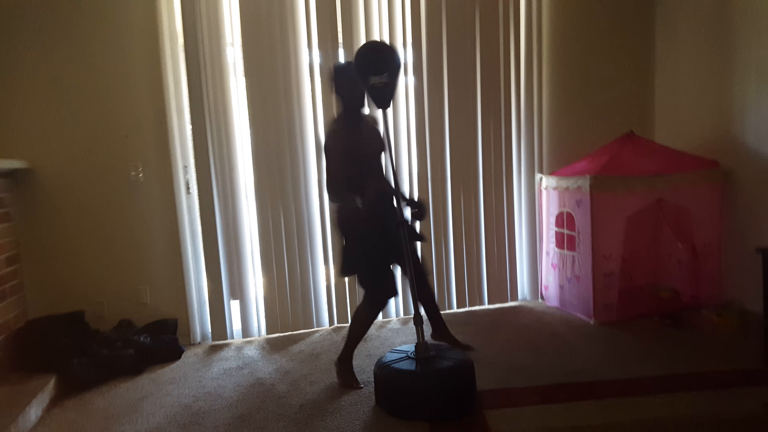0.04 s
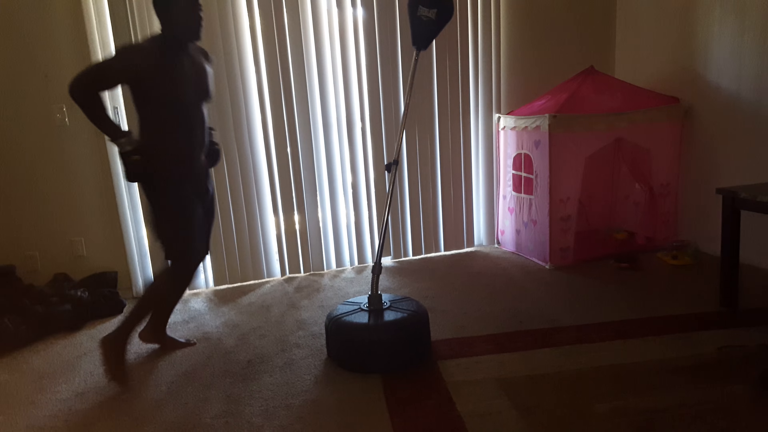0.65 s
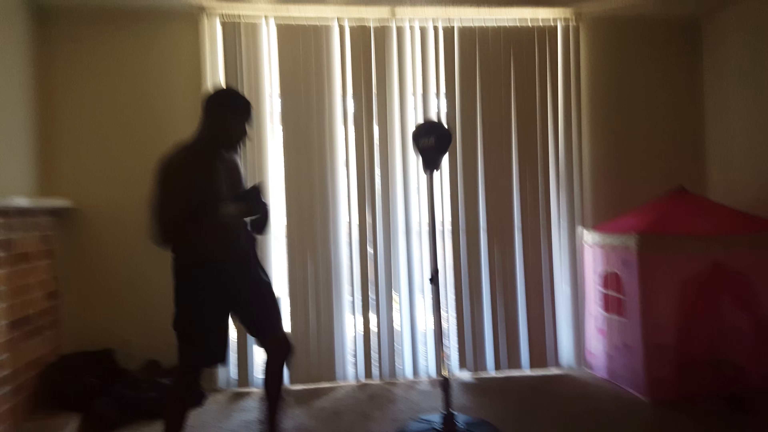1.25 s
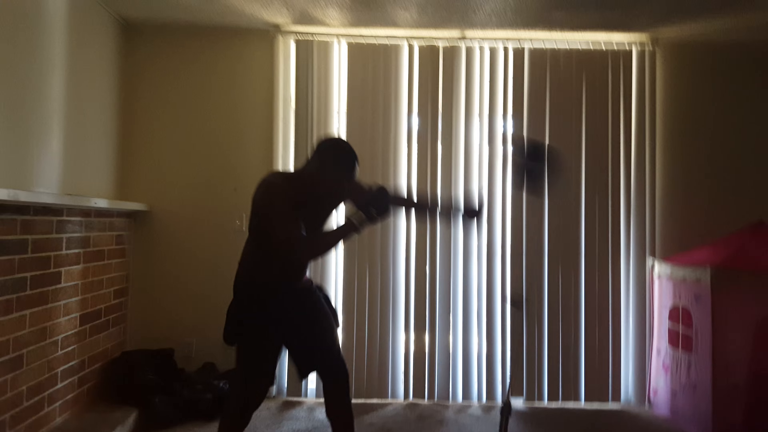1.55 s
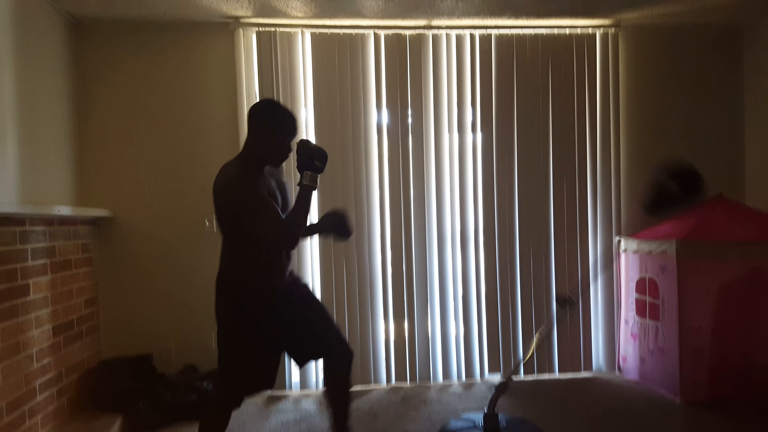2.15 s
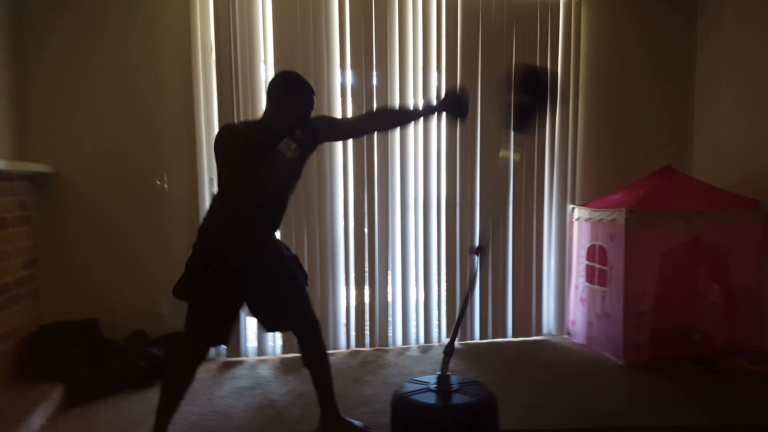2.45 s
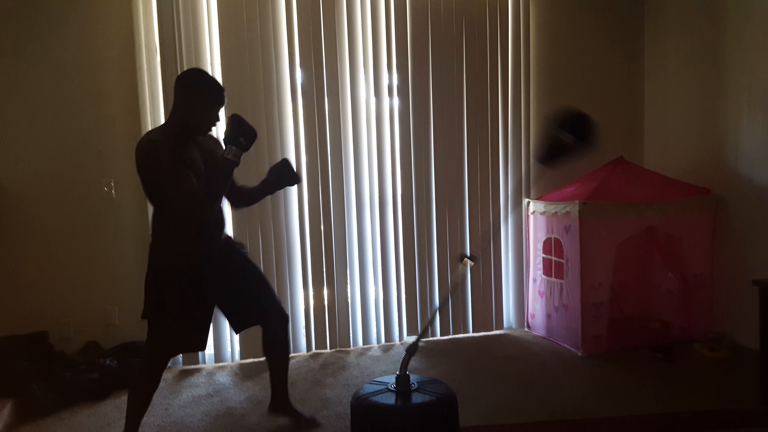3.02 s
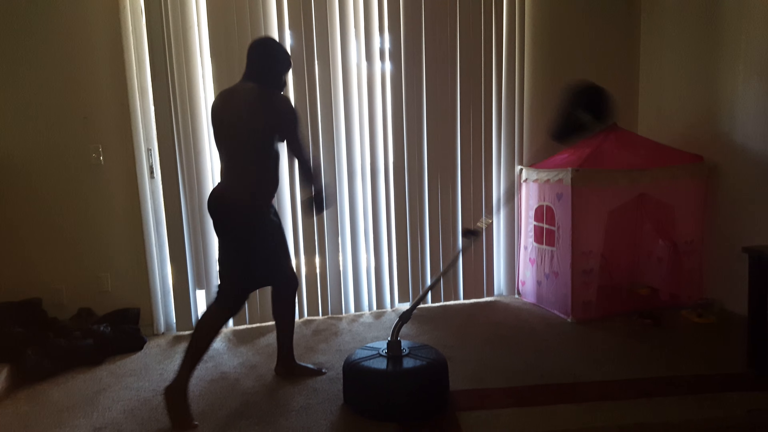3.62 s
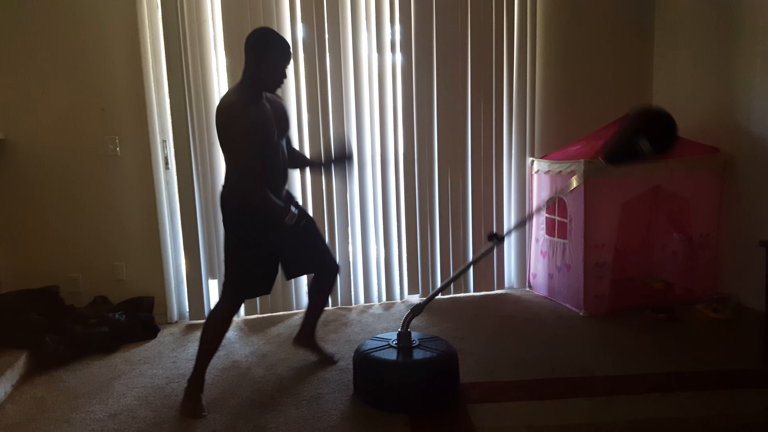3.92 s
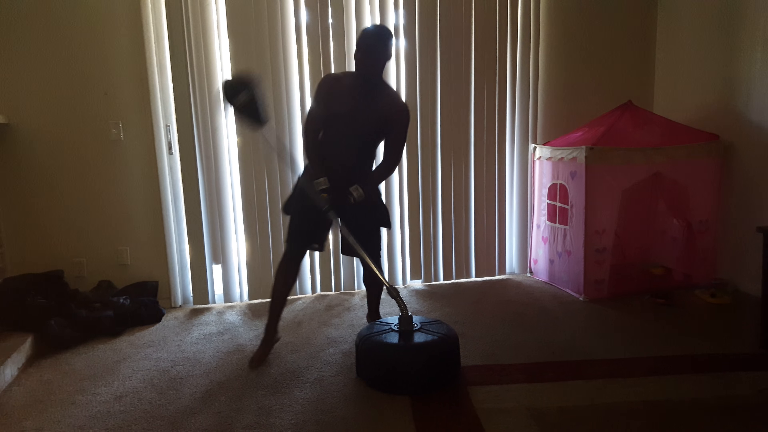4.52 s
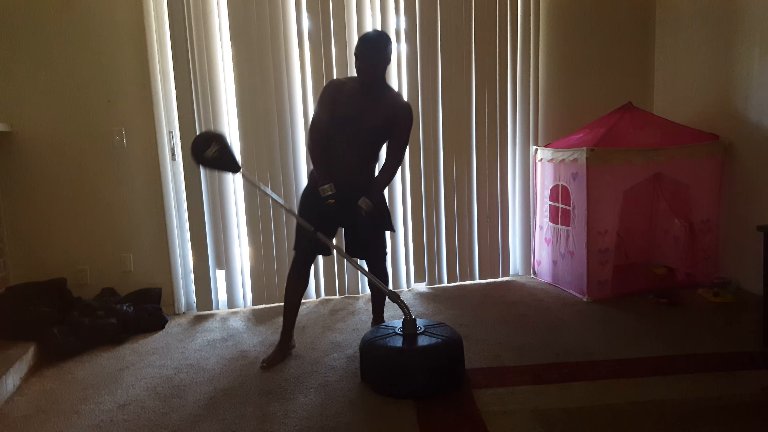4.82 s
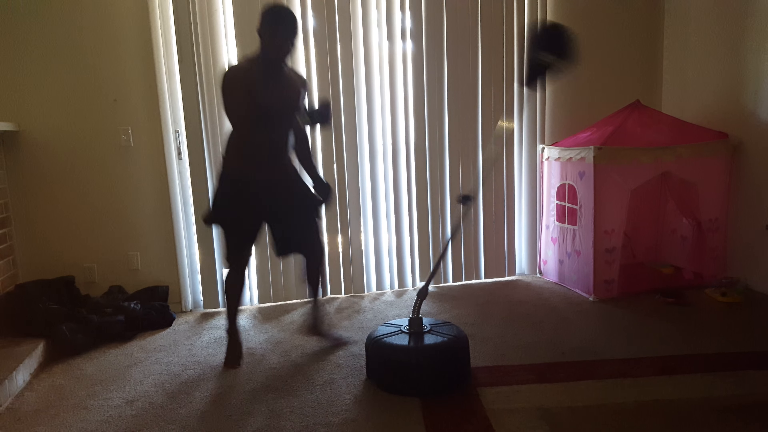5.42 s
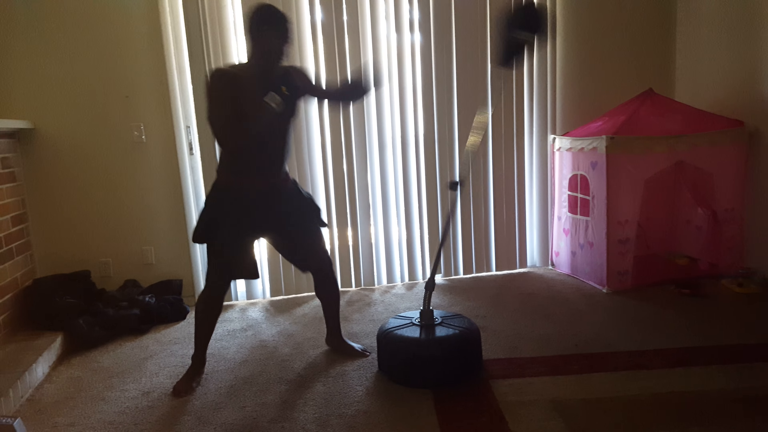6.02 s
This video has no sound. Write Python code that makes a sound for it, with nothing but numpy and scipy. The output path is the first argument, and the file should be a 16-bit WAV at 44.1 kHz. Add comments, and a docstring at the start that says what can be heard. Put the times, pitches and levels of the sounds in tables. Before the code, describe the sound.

A faint hum fills a carpeted living room, heard a few metres from a boxer. For the first 1.5 seconds, bare feet step softly and clothing rustles. At about 1.5 seconds a glove hits a reflex bag with a slap and a hollow thud; the metal spring rattles, the plastic base knocks and the floor booms low. Small ticks follow near 2 seconds. A harder punch lands at 2.4 seconds, then a quick, duller pair at 3.3 and 3.5, each with rattling and knocking. From about 4 to 6 seconds it is quieter, with swishes of cloth and leather, shuffling feet and light knocks from the swinging pole, a faint squeak at 4.5 and a light graze of the ball at 5.3. Just before 6.2 seconds a final strong punch lands with a sharp rattle, a clack from the base and a high metal squeak.

```python
"""A boxer works a free-standing reflex bag in a carpeted living room, a few metres away.
Over a faint hum, clothing rustles, bare feet shuffle and a fitting ticks. From 1.5 s gloves strike
the hollow ball four times: each impact excites its air cavity, the pole's coil spring rattles, the
plastic base knocks and the floor booms in its lowest modes. In a lull the spring joint squeaks and
the ball grazes the boxer; just after 6 s a fifth punch lands, with another squeak."""
import sys
import numpy as np
from scipy import signal
from scipy.fft import rfft, irfft, next_fast_len
from scipy.io import wavfile
from scipy.ndimage import uniform_filter1d

SR = 44100
rng = np.random.default_rng(int(sys.argv[2]) if len(sys.argv) > 2 else 0)


def master_out(mix):
    """Clip the mix to full scale and print it as 16-bit PCM to the path in sys.argv[1]."""
    frames = np.transpose(np.atleast_2d(mix))
    ceiling = np.clip(frames, -1, 1)
    pcm = np.round(ceiling * 32767).astype(np.int16)
    wavfile.write(sys.argv[1], SR, pcm)


N = 276066
TIME = np.arange(N) / SR


def from_db(db):
    """Amplitude ratio of a level in decibels."""
    return 10 ** (np.asarray(db) / 20)


def rms_one(x):
    """Normalise to unit mean power."""
    return x / np.sqrt(np.mean(x ** 2) + 1e-20)


def energy_one(x):
    """Normalise to unit energy."""
    return x / np.sqrt(np.sum(x ** 2) + 1e-20)


def at_hz(points, hz):
    """Interpolate a table on a logarithmic frequency axis."""
    freqs, values = np.transpose(points)
    return np.interp(np.log(np.maximum(hz, 1)), np.log(freqs), values)


def convolve(x, response):
    """Linear filtering: a mono sound passes through a mono or stereo impulse response."""
    return signal.fftconvolve(np.atleast_2d(x), np.atleast_2d(response), axes=-1)[:, :N]


def body(spectrum, modes=(), size=4096):
    """Minimum-phase impulse response: a broad spectrum with Lorentzian peaks and dips."""
    hz = np.fft.rfftfreq(size, 1 / SR)
    modes_db = sum(gain / (1 + (2 * (hz - centre) / width) ** 2) for centre, width, gain in modes)
    cepstrum = irfft(np.log(from_db(at_hz(spectrum, hz) + modes_db)))
    cepstrum[1:size // 2] *= 2  # folding onto positive time makes the response causal
    cepstrum[size // 2 + 1:] = 0
    return energy_one(irfft(np.exp(rfft(cepstrum))))


def damped_mode(hz, width_hz, size):
    """Free vibration of a damped oscillator: the wider the resonance, the faster the decay."""
    age = TIME[:size]
    return energy_one(np.sin(2 * np.pi * hz * age) * np.exp(-np.pi * width_hz * age))


def voiced_at(spectrum, pitch_hz, db_per_octave=5):
    """Small, stiff contacts radiate little bass: the spectrum falls from an octave below the pitch."""
    return [(hz, db + db_per_octave * min(0, np.log2(2 * hz / pitch_hz))) for hz, db in spectrum]


def chatter(length, per_s, spread_db, swell=0, size=6144):
    """Poisson train of uneven contacts that swells over a share of its length, then dies away."""
    age = TIME[:size]
    touch = rng.random(size) < per_s / SR
    force = from_db(spread_db * np.clip(rng.standard_normal(size), -2, 2)) * rng.choice([-1, 1], size)
    touch[0], force[0] = True, from_db(spread_db)  # the first contact is a firm one
    rise = 1 - np.exp(-(age + 1 / SR) / max(swell * length, 1e-9))
    return energy_one(touch * force * rise * np.exp(-(age / length) ** 2))


def impulses(rows):
    """Ideal impacts: one impulse for each (time [s], level [dB])."""
    out = np.zeros(N)
    for s, db in rows:
        out[int(s * SR)] += from_db(db)
    return out


# Likeness of left and right in the room: (frequency [Hz], correlation [-1 to 1])
CORRELATION = [(60, 0.92), (180, 0.94), (350, 0.92), (700, 0.5), (1400, 0.13), (2800, 0.037), (5500, -0.11),
               (16000, -0.0048)]
def diffuse(spectrum, size=N):
    """Diffuse field: noise from all sides is correlated in the bass and independent in the treble."""
    hz = np.fft.rfftfreq(size, 1 / SR)
    mid, side = rfft(rng.standard_normal((2, size)))
    alike = np.clip(at_hz(CORRELATION, hz), -1, 1)
    pair = np.sqrt(1 + alike) * mid + np.sqrt(1 - alike) * side * [[1], [-1]]
    return rms_one(irfft(pair * from_db(at_hz(spectrum, hz)), size))


# Reverberation time: (frequency [Hz], T60 [s])
ROOM_T60 = [(120, 0.52), (700, 0.53), (3000, 0.51), (7000, 0.36), (13000, 0.21)]
# Direct sound and first reflections: (delay [s], relative amplitude [ratio])
ARRIVALS = [(0, 13.6), (.0026, 5.6), (.0068, 3.5)]
def room_paths(clarity_db, build_s=0.0016, size=21600):
    """Reverberation: each new path has early arrivals and a tail that dies soonest in the treble."""
    age, hz = TIME[:size], np.fft.rfftfreq(size, 1 / SR)
    centres, t60 = np.transpose(ROOM_T60)
    bands = np.array([at_hz(np.column_stack([centres, own]), hz) for own in np.eye(len(centres))])
    fades = np.exp(-np.log(1000) * age / t60[:, None]) * (1 - np.exp(-age / build_s))
    while True:
        white = rfft(diffuse([(1, 0), (SR, 0)], size=size))
        path = np.sum(irfft(white[:, None] * bands) * fades, axis=1)
        for delay, amplitude in ARRIVALS:
            path[:, int(delay * SR)] += amplitude * from_db(clarity_db)
        yield path


def in_room(sounds, clarity_db):
    """Superposition of (time [s], sound) pairs; boxer and bag move, so each takes its own path."""
    out = np.zeros((2, N))
    for (s, sound), path in zip(sounds, room_paths(clarity_db)):
        heard = convolve(sound, path)
        onward = out[:, int(s * SR):]
        onward[:, :heard.shape[1]] += heard[:, :onward.shape[1]]
    return out


# Spectrum of still room air: (frequency [Hz], relative level [dB])
AIR_SPECTRUM = [(20, -32), (40, -2.5), (110, 3.5), (200, 0), (400, -8.5), (1000, -9), (2500, -12),
                (6000, -18), (10000, -27), (16000, -38.5)]
def background(air_db=-59, hum_db=-62, hum_hz=120):
    """Stationary noise: diffuse room air and the pure tone of an appliance's mains hum."""
    return from_db(air_db) * diffuse(AIR_SPECTRUM) + from_db(hum_db) * np.sin(2 * np.pi * hum_hz * TIME)


# Envelope of sliding feet and cloth: (time [s], level [dB])
RUSTLE_ENVELOPE = [(0.0, -54), (0.212, -62.5), (0.266, -49.5), (0.434, -59.5), (0.802, -46), (0.898, -51.5),
                   (1.316, -51.5), (1.5, -61.5), (1.95, -51), (2.248, -58.5), (2.42, -51), (2.95, -58),
                   (3.146, -55), (3.28, -63), (3.95, -62), (4.524, -49.5), (4.916, -66.5), (5.182, -77),
                   (5.28, -58), (5.55, -49), (5.66, -47), (5.908, -56), (6.14, -48.5)]
# Spectrum of rubbing fibres: (frequency [Hz], relative level [dB])
CLOTH_SPECTRUM = [(80, 1.5), (200, 3), (400, 4), (900, -2.5), (1600, -2), (2700, -1.5), (3800, -6.5),
                  (5500, -5.5), (8000, -11.5), (13000, -16.5), (16000, -24)]
def rustle(grain_db=1.0):
    """Sliding friction: the fibres under soles and in shorts catch unevenly, modulating the noise."""
    grain = rms_one(uniform_filter1d(rng.standard_normal(N), size=300))
    level_db = np.interp(TIME, *np.transpose(RUSTLE_ENVELOPE)) + grain_db * grain
    return from_db(level_db) * diffuse(CLOTH_SPECTRUM)


# Bare feet landing: (time [s], level [dB], pitch [Hz], length [s])
STEPS = [(.01, -51, 111, 0.037), (.25, -52.5, 437, .02), (.329, -52.5, 910, 0.014), (.426, -53, 180, .006),
         (0.519, -51, 865, 0.015), (0.633, -50, 594, .014), (1.085, -52.5, 860, 0.019),
         (1.146, -50, 408, .014), (4.0, -52, 497, .006)]
# Spectrum of a heel on carpet: (frequency [Hz], relative level [dB])
HEEL_SPECTRUM = [(40, -5), (120, 13.5), (400, 1), (650, -4), (950, -0.5), (1500, -5.5), (5000, -21),
                 (16000, -47)]
def footsteps(ring_db=8, relative_width=0.43):
    """Cushioned impact: a soft heel on carpet gives a dull sound with one broad resonance."""
    for s, db, hz, length in STEPS:
        heel = body(voiced_at(HEEL_SPECTRUM, hz), [(hz, relative_width * hz, ring_db)])
        yield s, from_db(db) * convolve(chatter(length, per_s=900, spread_db=0.5), heel)


# Ticks of the fittings: (time [s], relative level [dB])
TICKS = [(.560, -57.5), (1.956, -52.5), (1.972, -50.5), (2.114, -61)]
# Spectrum of the fittings and the spring: (frequency [Hz], relative level [dB])
METAL_SPECTRUM = [(100, -15.5), (600, -12.5), (1800, -10), (2800, -2), (3400, -3.5), (4800, -0.5),
                  (7300, -2.5), (10000, -8.5), (13500, -13), (16000, -20)]
def ticks(direct_db=24, room_db=-7):
    """Impulse excitation: single light contacts in the fittings click, with a little reverberation."""
    tick = convolve(impulses(TICKS), body(METAL_SPECTRUM))
    return from_db(direct_db) * tick + from_db(room_db) * convolve(tick, next(room_paths(0)))


# Leather and nylon brushing past: (peak time [s], level [dB], standard deviation [s])
SWISHES = [(1.205, -49, 0.028), (1.32, -51.5, 0.018), (2.152, -53, 0.023), (4.202, -53.5, 0.037),
           (4.483, -51, 0.077), (4.865, -56, 0.05), (5.211, -45.5, 0.018), (5.647, -51, 0.074)]
# Spectrum of smooth rubbing: (frequency [Hz], relative level [dB])
SWISH_SPECTRUM = [(500, -3), (2500, -7), (5000, -2), (8000, -5), (11000, -10.5), (14000, -6), (16000, -20)]
def swishes():
    """Friction noise swells and fades in a Gaussian envelope as smooth surfaces pass."""
    envelope = sum(from_db(db) * np.exp(-((TIME - s) / width) ** 2 / 2) for s, db, width in SWISHES)
    return envelope * diffuse(SWISH_SPECTRUM)


# Blows and their effect on the stand: (time [s], thud level [dB], thud pitch [Hz], slap level [dB],
# bump level [dB], bump pitch [Hz], clack level [dB], clack pitch [Hz], settling level [dB],
# floor drive level [dB])
PUNCHES = [(1.5301, -21.5, 360, -19.5, -21.5, 280, -22.5, 900, -29, -42),
           (2.4398, -18, 434, -15.5, -18.5, 250, -21.5, 700, -23.5, -39.5),
           (3.3099, -22, 370, -37, -26, 360, -25.5, 330, -34, -48),
           (3.463, -26.5, 353, -48, -26.5, 330, -24.5, 260, -33, -41.5),
           (6.1602, -17.5, 360, -21.5, -20.5, 560, -16, 866, -25, -34.5)]
# Spectra of the hollow ball and of the leather: (frequency [Hz], relative level [dB])
THUD_SPECTRUM = [(40, -24), (90, -7), (170, -4), (300, -4.5), (500, -6), (950, -6.5), (1500, -9.5),
                 (3000, -35.5), (16000, -20)]
SLAP_SPECTRUM = [(100, -7), (500, -9.5), (850, -5.5), (1300, -4.5), (2000, -7), (3500, -9), (6500, -10.5),
                 (10000, -13.5), (16000, -29.5)]
# Resonances and dips of ball, pole and base: (frequency [Hz], bandwidth [Hz], gain [dB])
STAND_MODES = [(248, 29, 3), (404, 9.7, 4), (497.7, 6, 3), (580, 110, 0.5), (714, 8.6, -10),
               (872, 16, -8.5), (1096, 49, 4.5)]
def punches(ring_db=8, relative_width=0.19):
    """Cavity resonance: the glove's leather slaps and the air-filled ball answers with a hollow thud."""
    for s, thud_db, hz, slap_db, *_ in PUNCHES:
        thud = body(THUD_SPECTRUM, STAND_MODES + [(hz, relative_width * hz, ring_db)])
        yield s, -from_db(thud_db) * thud - from_db(slap_db) * body(SLAP_SPECTRUM)


# Clashes as the spring bends and returns: (time [s], level [dB], length [s], tilt [dB/octave])
RATTLES = [(1.543, -15, .021, -0.5), (1.574, -15, .042, 3), (1.7015, -26, 0.008, 3),
           (2.439, -17.5, .021, -.5), (2.493, -22.5, 0.019, 0), (2.596, -20, 0.0046, 2.5),
           (3.323, -17, 0.0027, 1.5), (3.343, -15.5, 0.012, 2), (3.419, -27, 0.016, 3),
           (3.471, -21, 0.023, -.5), (3.563, -17, .012, 2.5), (4.367, -41, 0.0026, -4),
           (5.375, -37, .012, -4.5), (5.417, -36, 0.0083, 1), (6.169, -15.5, 0.024, 2.5),
           (6.203, -12, 0.0085, 0.3)]
# Resonances of the spring: (frequency [Hz], bandwidth [Hz], gain [dB])
SPRING_MODES = [(5006, 50, 3), (5329, 40, 4), (6790, 30, 4), (7224, 25, 5), (7617, 30, 3)]
def spring_rattles():
    """Repeated impact: coils clash in fast bursts and excite the spring's high modes."""
    for s, db, length, tilt in RATTLES:
        spectrum = [(hz, level + tilt * np.log2(hz)) for hz, level in METAL_SPECTRUM]
        clashes = chatter(length, per_s=2000, spread_db=2.0, swell=0.19)
        yield s, from_db(db) * convolve(clashes, body(spectrum, SPRING_MODES))


def rocking(bump_delay_s=0.014, clack_delay_s=0.036, length_s=0.012):
    """Damped rocking: after each punch the pole bumps, the base clacks and the stand settles."""
    interval_s, loss_db, settle_length_s, settle_hz = 0.026, 6.5, 0.005, 172
    for s, _, _, _, bump_db, bump_hz, clack_db, clack_hz, settle_db, _ in PUNCHES:
        yield s + bump_delay_s, bump_db, length_s, bump_hz
        yield s + clack_delay_s, clack_db, length_s, clack_hz
        for bounce in range(3):
            bounce_s = s + clack_delay_s + (bounce + 1) * interval_s
            yield bounce_s, settle_db - bounce * loss_db, settle_length_s, settle_hz


# Lone knocks as the pole swings on: (time [s], level [dB], length [s], pitch [Hz])
LONE_KNOCKS = [(1.704, -44.5, 0.011, 334), (2.612, -35, .0098, 176), (3.584, -31, 0.015, 1220),
               (3.761, -46.5, .009, 360), (3.772, -49, .008, 955), (4.362, -50, 0.0075, 400),
               (4.43, -47, 0.048, 217), (5.388, -45, 0.0066, 198), (5.422, -42.5, 0.0067, 1280),
               (5.441, -44.5, 0.014, 416), (5.543, -40.5, 0.14, 304)]
# Spectrum of the plastic base: (frequency [Hz], relative level [dB])
BASE_SPECTRUM = [(35, -15.5), (60, -2.5), (120, 1.5), (260, -3), (450, -3.5), (900, -6.5), (1500, -13),
                 (2800, -14.5), (6000, -17.5), (16000, -47)]
def base_knocks(ring_db=11, relative_width=0.32):
    """Shell resonance: the pole bumps in its hollow plastic base, each bump favouring one mode."""
    for s, db, length, hz in [*rocking(), *LONE_KNOCKS]:
        shell = body(voiced_at(BASE_SPECTRUM, hz), STAND_MODES + [(hz, relative_width * hz, ring_db)])
        yield s, from_db(db) * convolve(chatter(length, per_s=350, spread_db=3.0), shell)


# Lowest modes of the floor: (frequency [Hz], gain [dB], T60 [s])
FLOOR_MODES = [(40.5, 2, 1), (79.4, 15, 0.38)]
def floor_boom(delay_s=0.0215, rise_s=0.016):
    """Structure-borne sound: just after each punch the rocking base sets the floor's modes swinging."""
    age = TIME[:SR]
    ring = sum(from_db(db - 60 * age / t60) * np.sin(2 * np.pi * hz * age) for hz, db, t60 in FLOOR_MODES)
    thumps = impulses((s + delay_s, drive_db) for s, *_, drive_db in PUNCHES)
    return convolve(thumps, ring * (1 - np.exp(-age / rise_s)))


# Squeaks of the spring joint: (time [s], level [dB], length [s])
SQUEAKS = [(4.498, -41, 0.019), (6.209, -21, .04)]
# Resonances of the joint: (frequency [Hz], bandwidth [Hz], relative level [dB])
JOINT_MODES = [(4440, 160, -7), (4900, 110, -7), (4810, 140, 2)]
def squeaks():
    """Stick-slip friction: tiny slips in the joint keep a cluster of metal resonances ringing."""
    for s, db, length in SQUEAKS:
        scrape = 0
        for hz, width_hz, mode_db in JOINT_MODES:
            slips = chatter(length, per_s=2800, spread_db=2.5)
            scrape = scrape + from_db(mode_db) * convolve(slips, damped_mode(hz, width_hz, SR // 20))
        yield s, from_db(db) * energy_one(scrape)


# The ball brushes the boxer: (time [s], slap level [dB], ring level [dB], pitch [Hz], bandwidth [Hz])
GRAZE = (5.3097, -38, -39, 905, 200)
def graze():
    """Glancing impact: a light slap excites one high, hollow mode of the ball."""
    s, slap_db, ring_db, hz, width_hz = GRAZE
    slap = body(SLAP_SPECTRUM)
    return s, from_db(slap_db) * slap + from_db(ring_db) * damped_mode(hz, width_hz, len(slap))


def scene():
    """Direct-to-reverberant ratio: the spring, near the floor, is heard mostly through the room."""
    ball = in_room([*punches(), graze()], clarity_db=-3.0)
    stand_and_feet = in_room([*base_knocks(), *footsteps(), *squeaks()], clarity_db=3.5)
    spring = in_room(spring_rattles(), clarity_db=-5)
    return ball + stand_and_feet + spring + ticks() + floor_boom() + swishes() + rustle() + background()


# Colour difference of the two microphone ports: (frequency [Hz], left minus right [dB])
PORT_BALANCE = [(80, 1), (350, 1.8), (700, .5), (1400, 1.5), (2800, 3), (5500, 2.5), (9500, -4.5),
                (14000, -2.5)]
def record(dry, cutoff_hz=16000):
    """Transduction: each port colours the sound, saturation rounds peaks and a low-pass cuts the top."""
    size = next_fast_len(N + SR // 10)
    lean_db = at_hz(PORT_BALANCE, np.fft.rfftfreq(size, 1 / SR)) / 2
    ports = irfft(rfft(dry, size) * from_db(lean_db * [[1], [-1]]), size)[:, :N]
    lowpass = signal.ellip(10, .2, 80, cutoff_hz, fs=SR, output="sos")
    return signal.sosfilt(lowpass, np.tanh(ports))


dry = scene()
out = record(dry)
master_out(out)
```